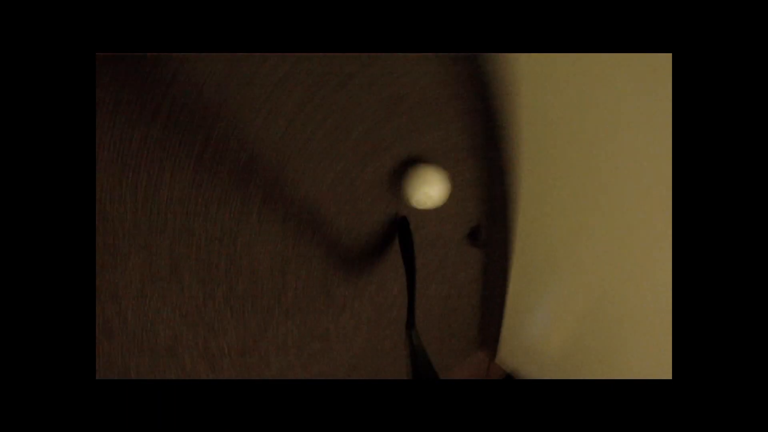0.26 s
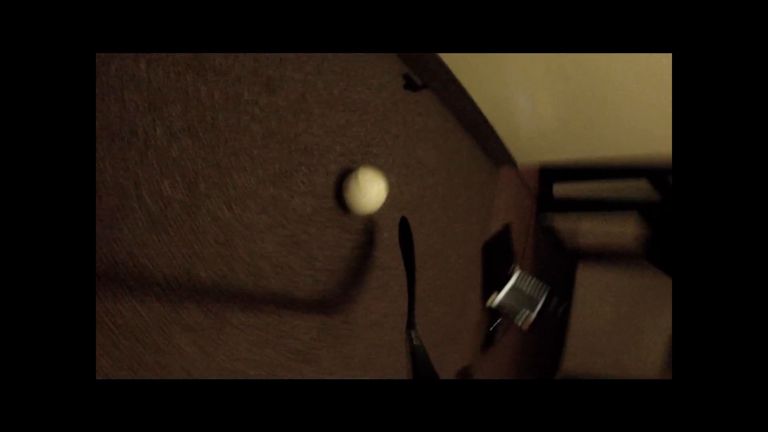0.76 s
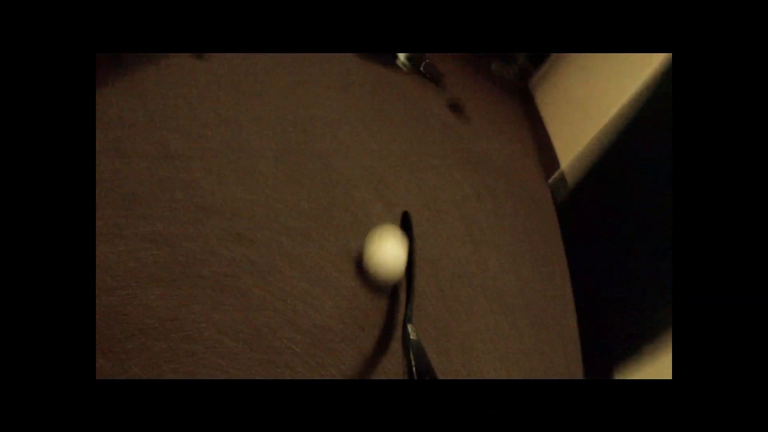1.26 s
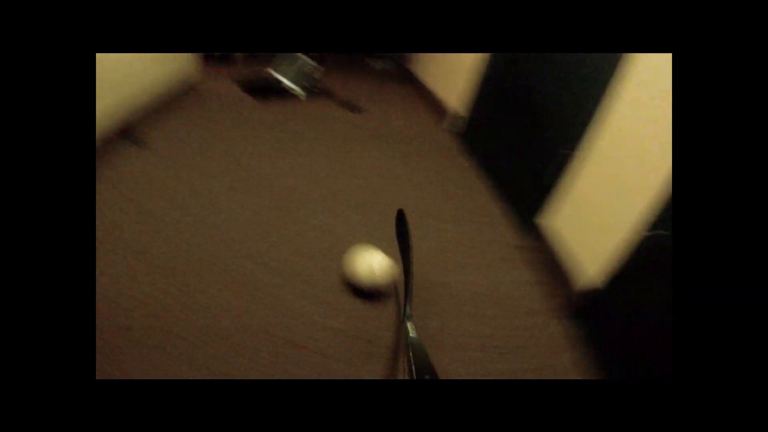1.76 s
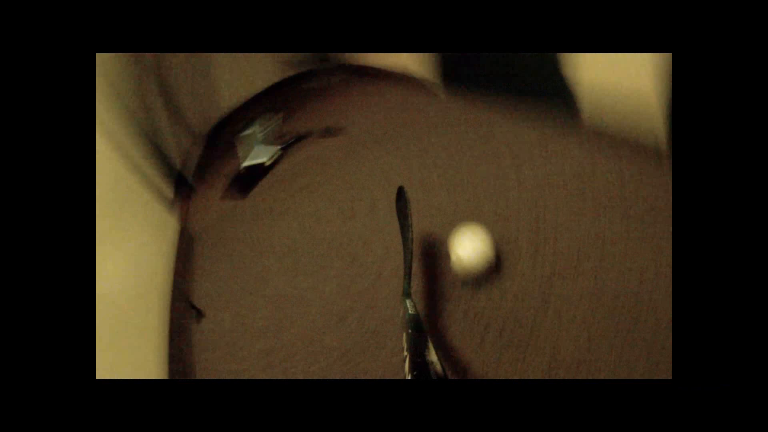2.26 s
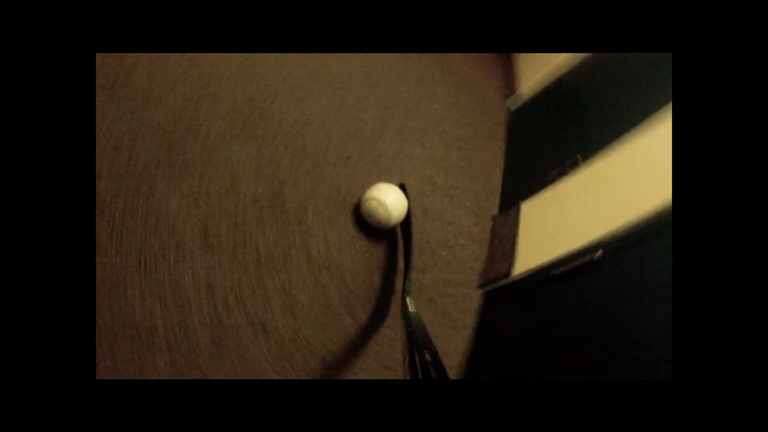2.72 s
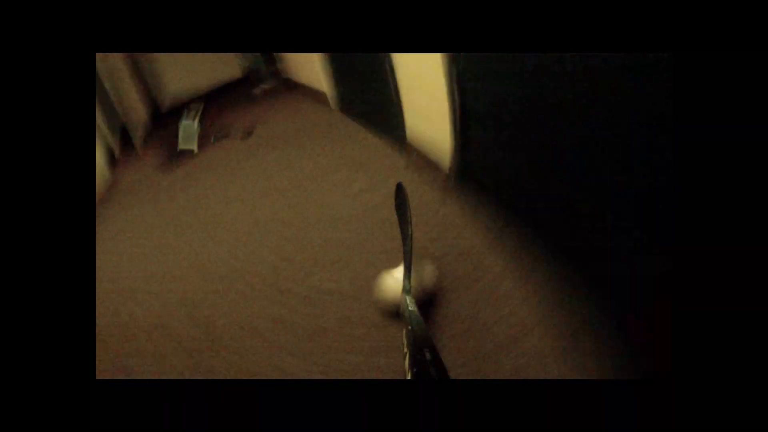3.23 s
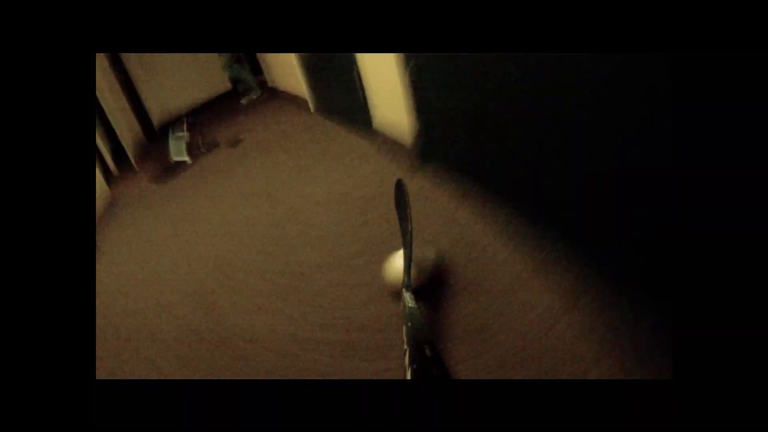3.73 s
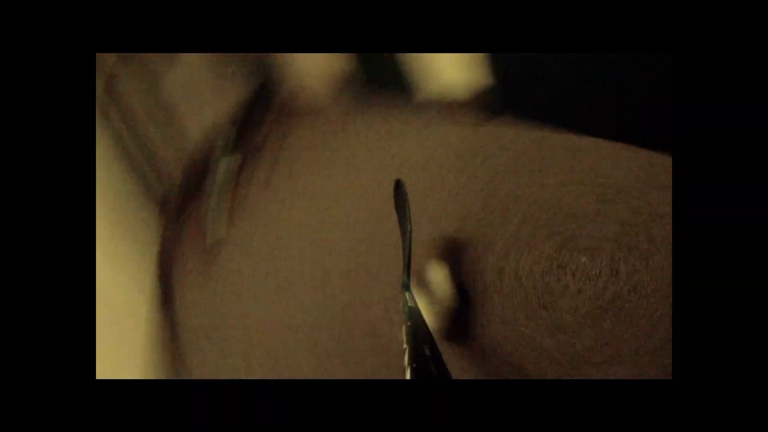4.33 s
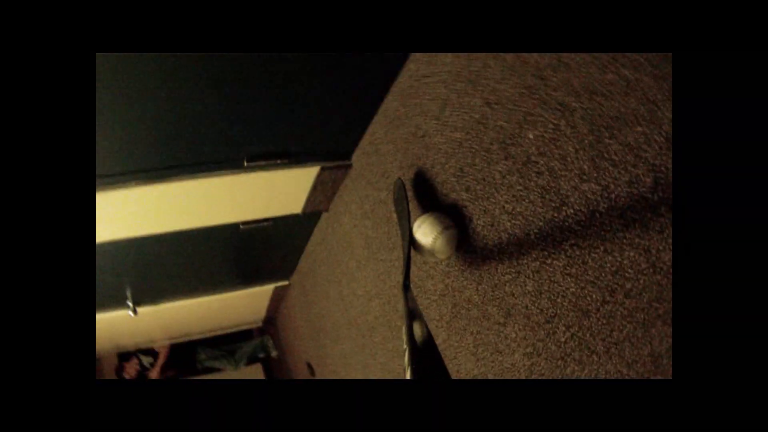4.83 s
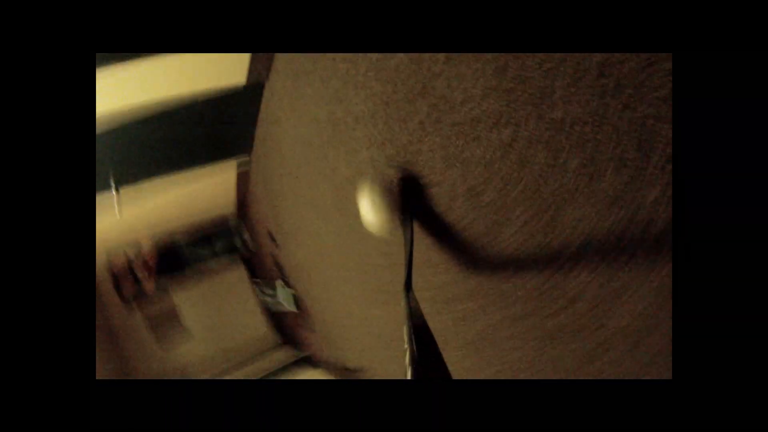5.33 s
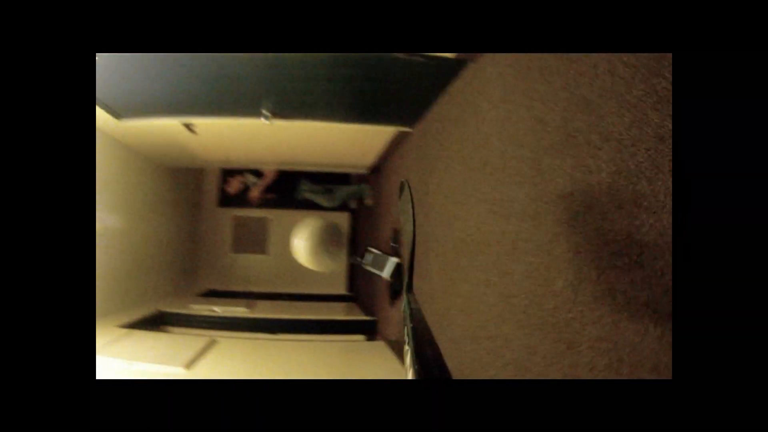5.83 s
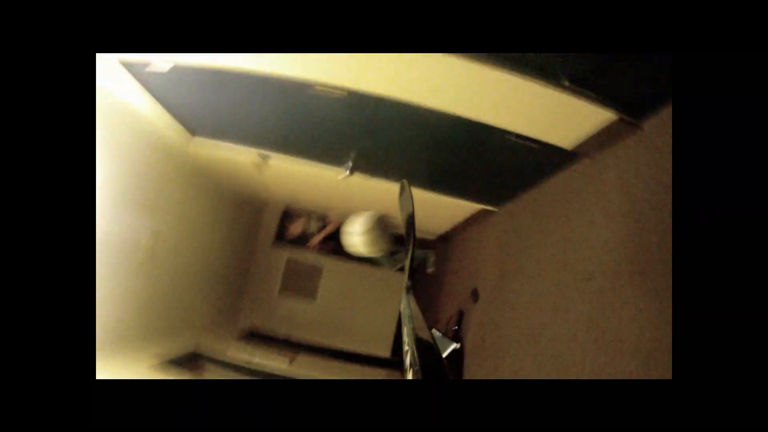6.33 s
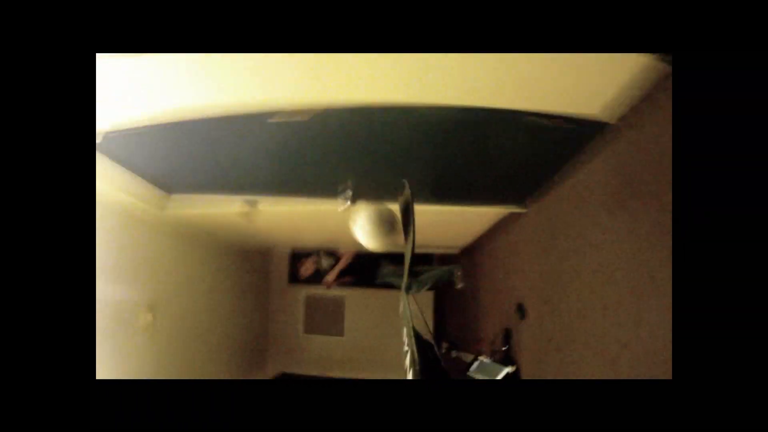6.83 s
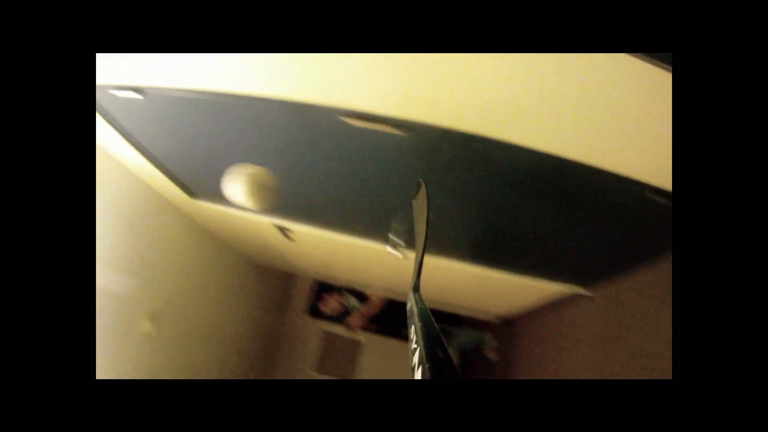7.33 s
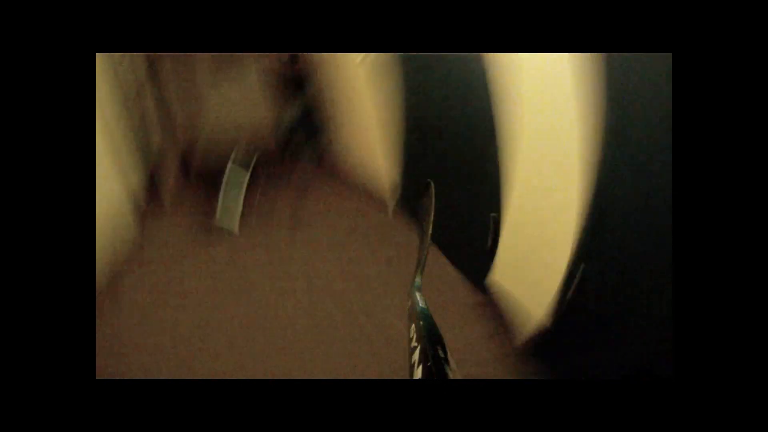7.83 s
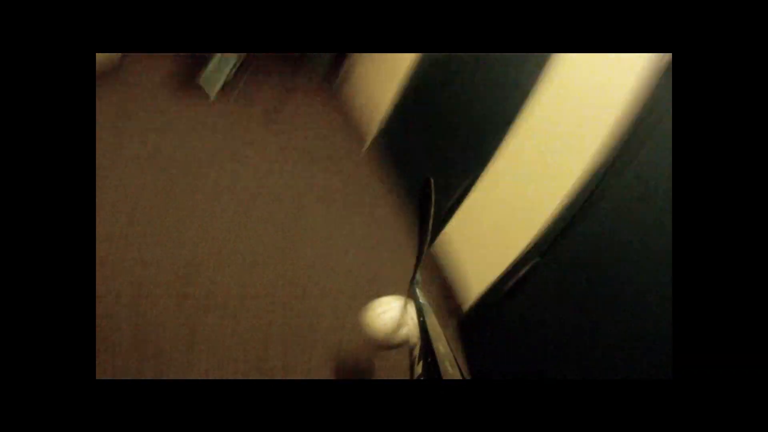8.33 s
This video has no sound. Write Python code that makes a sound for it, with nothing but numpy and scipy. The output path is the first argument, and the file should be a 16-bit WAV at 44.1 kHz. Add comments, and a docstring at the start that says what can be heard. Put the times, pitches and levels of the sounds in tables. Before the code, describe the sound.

Heard through a hockey stick's shaft by a small clamped camera in a carpeted hallway: hard woody clacks of a ball on the blade, two or three a second, distorting at the input. Clamp knocks and short rattles fall between them, with gritty carpet scrapes and low handling rumble. Midway the blade lifts and juggles the ball over a thin bright buzz, then returns to the floor.

```python
"""Carpeted hallway, heard through the shaft of a hockey stick by a small camera clamped to it.
The blade taps a ball, the clamp rattles and knocks: noise bursts ring banks of decaying modes.
The blade scrapes the carpet, or the clamp buzzes while it is lifted (grainy noise through resonances);
the shaft sways and rumbles in the hands (low filtered noise), with dull decaying bumps and hums. Hard taps
overload the input; the camera samples slowly and holds each value, which mirrors the sound into the treble."""
import sys
import numpy as np
from scipy import signal
from scipy.io import wavfile
from scipy.ndimage import uniform_filter1d

SR = 44100
rng = np.random.default_rng(int(sys.argv[2]) if len(sys.argv) > 2 else 0)


def store_pcm(level_fs):
    """Save levels as 16-bit WAV."""
    pcm = np.round(np.clip(level_fs, -1, 1) * 32767).astype(np.int16)
    wavfile.write(sys.argv[1], SR, np.atleast_2d(pcm).T)


N = 377937

# scrapes of the blade on the carpet, and clamp buzz while it is lifted:
# (start [s], length [s], starting level [dB], change over the stroke [dB])
RUB_STROKES = [(0.0, 0.076, -31, -15.5), (0.125, 0.15, -46, 6.5), (0.481, .16, -46.5, 5.5),
               (0.659, .15, -50.5, -2), (0.819, 0.012, -34, -26), (0.879, 0.083, -53.5, 8),
               (1.045, 0.042, -62, 16.5), (1.148, 0.08, -48.5, 14.5), (1.31, 0.26, -70.5, 32),
               (1.651, 0.076, -69, 0.5), (1.797, 0.094, -71, -0.5), (2.071, 0.27, -42, 1),
               (2.521, 0.14, -48.5, -7), (2.834, 0.05, -49, 10), (2.945, 0.22, -55.5, -2.5),
               (3.2, .1, -78, 6), (3.307, 0.044, -49.5, 6), (3.526, 0.12, -50.5, 8.5),
               (3.786, 0.08, -67, 20), (3.958, 0.077, -47.5, 0), (4.091, 0.07, -60.5, 12),
               (4.13, 0.13, -52, 4.5), (4.326, 0.15, -55, 18.5), (4.519, .03, -51.5, 3),
               (4.552, 0.14, -40.5, -2), (4.938, 0.1, -53.5, 10), (5.065, 0.21, -54.5, -8),
               (5.266, 0.043, -49, 2), (5.516, 0.13, -41.5, -26.5), (5.86, .08, -52.5, 5),
               (6.116, 0.15, -58, -8), (6.419, 0.07, -51, 2.5), (6.689, 0.15, -57, -3),
               (6.96, 0.14, -61, 3.5), (7.194, 0.31, -52, -11), (7.628, 0.29, -49.5, -2.5),
               (7.841, 0.22, -52.5, -21), (8.052, 0.27, -49.5, -13), (8.39, 0.048, -68.5, 10.5)]
# blade off the carpet, juggling the ball, only a thin bright buzz left: (from [s], to [s])
LIFTED_SPAN = (5.44, 7.55)
# colour of shaft and case under scrapes and buzz: (pitch [Hz], width of each filter pass [Hz], relative level [dB])
RUB_DULL_BANDS = [(478, 53, -12), (760, 130, -4), (1080, 430, -6.5), (1480, 290, -16.5), (1720, 480, -9)]
RUB_BRIGHT_BANDS = [(2150, 110, 2), (2450, 87, -2), (3300, 1600, -16), (3570, 310, -10.5), (4656, 360, -29),
                    (5160, 800, -16)]
# swings and jolts of the shaft: (peak time [s], level [dB], build-up [s per 20 dB], die-away [s per 20 dB])
SHAFT_SWINGS = [(0.118, -21, 0.3, 0.13), (.28, -23, .14, .1), (.45, -28.5, 0.082, 0.28),
                (0.962, -36, .6, 0.063), (1.118, -37, 0.1, .3), (1.241, -42.5, 0.31, 0.4),
                (1.55, -30.5, 0.15, 0.08), (1.74, -20.5, 0.057, 0.096), (1.91, -34.5, .14, 0.42),
                (2.151, -19.5, 0.027, 0.31), (2.391, -33, .3, .07), (2.55, -24, .045, .2),
                (3.128, -33, 0.47, .13), (3.341, -36, 0.2, .25), (3.601, -31, .14, 0.12),
                (3.87, -29, 0.22, .045), (4.03, -19.5, 0.097, .09), (4.25, -35, .2, .15),
                (4.488, -23, .13, .065), (4.892, -32, 1, .2), (5.039, -19.5, 0.041, 0.37),
                (5.341, -30, 0.59, .08), (5.52, -35, 0.028, .15), (5.62, -31.5, .05, 0.19),
                (5.721, -30, .2, .065), (5.94, -41, 0.098, .3), (6.28, -36.5, .3, 0.071),
                (6.52, -38.5, .19, .13), (6.78, -35.5, .23, 0.21), (7.042, -32, 0.078, .15),
                (7.47, -28, 0.24, 0.14), (7.658, -27.5, 0.054, 0.43), (7.779, -23, 0.17, 0.32),
                (8.09, -30.5, .15, .1), (8.328, -29, 0.19, .095), (8.475, -35, .02, 0.2)]
# sway and grip resonances: (pitch [Hz], width of each filter pass [Hz], relative level [dB])
SWAY_BANDS = [(54.56, 18, -3), (38.3, 6.7, -9.5), (28.7, 8.5, -7)]
GRIP_BANDS = [(120.5, 5.7, 5), (195, 32, 1.5), (292, 15, -7)]
# grip rumble before it follows sway and rubbing: (time [s], level [dB])
GRIP_CURVE = [(0.0, -30), (0.07, -54.5), (0.76, -56.5), (1.14, -57.5), (1.31, -62.5), (2.22, -52),
              (2.67, -55.5), (3.84, -59), (4.18, -48), (5.04, -59), (5.2, -54), (5.37, -57), (6.25, -81),
              (6.4, -65), (7.47, -61.5), (7.69, -53.5), (8.28, -64), (8.57, -55.5)]
# clamp knocks, rebounds and scuffs: (time [s], level [dB], upper modes [dB], rattle t60 [s])
KNOCKS = [(0.003, -14.5, -2, 0.046), (0.081, -16.5, -3, 0.057), (0.104, -8.5, 8, 0.058),
          (0.475, -23.5, 14, 0.034), (0.487, -33, 5, 0.038), (.69, -24, 32, 0.036), (0.699, -25, 38, 0.03),
          (.743, -35, 25, 0.13), (0.816, -26.5, -5, 0.081), (0.912, -30.5, 12, 0.042),
          (1.049, -34, -25, 0.096), (1.159, -28.5, -13, 0.3), (1.485, -29, 29.5, 0.088),
          (1.512, -24.5, 4, 0.024), (1.727, -13.5, -3.5, 0.028), (1.74, -12.5, -4, 0.056),
          (1.802, -42.5, -2, .03), (1.859, -42, -25, .06), (1.936, -11, 2, 0.066),
          (2.166, -20, -6.5, 0.095), (2.458, -35.5, -1.5, 0.037), (2.528, -31.5, -12, 0.092),
          (2.706, -16.5, 2, 0.046), (2.825, -39.5, -24.5, 0.045), (2.875, -33.5, -24.5, 0.067),
          (2.95, -31, -9, 0.049), (3.253, -37, 12, 0.044), (3.309, -29, 24.5, 0.039),
          (3.377, -16.5, 8.5, 0.027), (3.457, -38, -24, 0.044), (3.524, -23, 8, 0.033),
          (3.591, -21.5, 8, 0.029), (3.989, -10.5, 2.5, 0.034), (4.12, -9.5, 19, 0.056),
          (4.269, -18.5, -3.5, 0.023), (4.298, -25, -4, 0.078), (4.397, -34, -5, 0.051),
          (4.426, -29, -4, 0.082), (4.556, -22.5, -12, 0.065), (4.806, -28, -5, 0.065),
          (5.036, -18, 18, 0.077), (5.061, -19, -23, 0.041), (5.084, -23, -27, 0.14),
          (5.099, -11.5, 4, 0.021), (5.123, -9.5, -15.5, 0.036), (5.159, -26.5, 1, 0.042),
          (5.193, -32, -6, 0.03), (5.345, -20, -5, 0.096), (5.51, -35, 32.5, 0.031),
          (5.577, -27.5, 28, 0.22), (5.746, -28, 3.5, 0.015), (5.895, -36, 24, 0.033),
          (6.126, -34, 34.5, 0.033), (6.16, -30, 34, 0.055), (6.418, -33.5, 30.5, 0.044),
          (6.531, -13.5, 8.5, 0.069), (6.687, -33, 31, 0.15), (6.825, -5, 5, 0.04),
          (6.955, -36.5, 34, 0.13), (6.992, -40.5, 9, .05), (7.103, -22.5, -8.5, 0.062),
          (7.177, -28.5, 26, 0.013), (7.507, -16, -1.5, 0.049), (7.655, -28, -2, 0.14),
          (7.754, -26.5, 3, 0.06), (7.807, -21.5, -8, 0.048), (7.828, -20, 0, 0.024),
          (7.953, -34, -6, 0.017), (8.066, -21, 2, 0.048), (8.18, -36, -10, 0.05),
          (8.286, -13.5, -10.5, 0.077)]
# shaft modes: (pitch [Hz], level [dB], t60 [s])
SHAFT_MODES = [(156, -3.5, 0.042), (192, -1, 0.047), (251, -1.5, 0.044), (319.7, -10, 0.069),
               (440, -12.5, 0.015)]
# blade modes: (multiple of blade pitch [ratio], level [dB], t60 [s], raised to 4 ms if shorter)
BLADE_RATIOS = [(1, 7.5, 0.011), (1.3, 2, 0.011), (.72, -23.5, 0.0025)]
# clamp and case modes: (pitch [Hz], level [dB], t60 [s])
CASE_MODES = [(1660, -10, 0.024), (2011, 11.5, 0.0084), (2252, 0, 0.011), (2768, -24, 0.01),
              (3484, -1, 0.011), (4320, -30, 0.0082), (4780, -51, 0.049)]
# dull bumps of the shaft against hands and carpet: (time [s], level [dB], pitch [Hz], t60 [s])
SHAFT_BUMPS = [(0.016, -24, 242, 0.16), (0.085, -13, 89, 0.077), (.286, -8, 70.3, 0.039),
               (0.418, -6, 193, 0.035), (1.234, -15.5, 414, 0.026), (1.66, -31.5, 150, 0.041),
               (1.725, -1, 197, 0.035), (1.74, -8.5, 128.4, 0.083), (1.901, -5, 170, 0.042),
               (2.133, -20.5, 93, 0.029), (2.164, -29.5, 93, 0.073), (3.989, -9, 185.6, 0.061),
               (4.433, -29.5, 91.5, 0.069), (4.469, -10, 70, 0.088), (4.674, -22, 194, 0.077),
               (5.021, -18.5, 90.5, 0.06), (5.056, -16.5, 200, 0.091), (5.084, -14, 160, 0.079),
               (5.274, -13.5, 155.7, 0.099), (7.644, -26.5, 95.2, 0.048), (7.768, -9.5, 79.4, 0.043),
               (8.284, -25, 186, 0.19)]
# ball on blade: (time [s], level [dB], blade pitch [Hz], upper modes [dB], shaft modes [dB], contact [ms])
BALL_TAPS = [(0.289, 1, 780, 5.5, -32, 5.05), (0.419, -2.5, 786, -5.5, -12.5, 3.96),
             (0.953, 31, 845, -13, -33.5, 5.46), (1.107, 11, 970, 2.5, -10, 3.2),
             (1.237, 8.5, 760, -6, -32.5, 3.5), (1.539, 16.5, 1058, -4.5, -9.5, 5.5),
             (1.902, 12.5, 843, 11, -14.5, 3.47), (2.358, 14.5, 1100, 2.5, -18, 3.27),
             (2.689, 19, 870, -4.5, -33.5, 4.24), (3.123, 18.5, 660, 4, -55, 5),
             (3.352, 21.5, 925, -2.5, -17.5, 4.83), (3.618, 18.5, 822, -2, -7.5, 5.5),
             (3.827, -2, 856, -5.5, -9.5, 6.3), (4.237, 9.5, 1112, -12, -10.5, 6.9),
             (4.782, 3, 955, -3.5, -8.5, 6), (5.276, -3.5, 980, 4, -8.5, 4.4),
             (5.306, 0.5, 1126, -24, -48, 7.2), (5.713, 10.5, 1020, -0.5, -28.5, 7.3),
             (5.967, 18, 892, -1, -67, 5.8), (6.274, 33.5, 833, 6.5, -58, 4.2),
             (6.505, 16.5, 1147, -13.5, -17, 6.6), (6.791, 23, 1108, -5.5, -30, 5.3),
             (7.063, 13, 1284, 2.5, -14, 8), (7.475, 16.5, 813, 0, -35, 5.84),
             (8.247, 15.5, 770, -2, -19.5, 5.8), (8.467, 5.5, 756, -3.5, -4, 5.7)]
# the shaft humming on after some taps and knocks: (time [s], level [dB])
SHAFT_HUMS = [(.953, -37.5), (1.74, -31), (2.689, -34.5), (3.123, -29), (3.617, -31), (3.827, -34.5),
              (3.989, -35), (4.237, -34.5), (4.782, -30), (5.345, -40), (7.063, -34.5), (7.506, -31),
              (8.286, -31.5), (8.467, -32.5)]

HISS_DB = -79
STROKE_RISE, STROKE_FALL = .015, .025  # s per 20 dB
RUB_REST_DB, LIFTED_REST_DB = -66, -76  # between strokes, blade on and off the carpet
BRIGHT_DB, LIFTED_BRIGHT_DB = -4.5, 5  # bright share against the dull, blade on and off the carpet
SURGE_DB = 2.5  # slow uneven surges of the grain
CRACKLES_PER_S, CRACKLE_DB, CRACKLE_DECAY_S = 26, 12, 0.00067
GRIP_FOLLOWS_SWAY, GRIP_FOLLOWS_RUB = 0.4, .25  # dB of grip per dB of sway or rubbing
GRIP_LUMP_DB = 2.5
KNOCK_HZ, KNOCK_SPREAD = 1004, 0.07  # blade pitch under a knock and its scatter
KNOCK_SHAFT_DB, KNOCK_SHAFT_TILT = -18.5, 1  # the brighter a knock, the less it moves the shaft
# rattle after a 0 dB tap, against the contact; dB the rattle gains per dB of blow; t60
RATTLE_DB, RATTLE_GROWTH, RATTLE_T60_S = -14, 0.24, 0.057
BLOOM_DB = -12.5  # how much the rattle also rings the shaft
HUM_HZ, HUM_T60_S = 337, .12
CEILING, HOLD_HZ, TOP_HZ = .5, 12000, 16300  # full level, held values per second, top cut


def undb(db):
    """Gain for a level in dB."""
    return 10 ** (np.asarray(db) / 20)


def unit(x):
    """Scale to an RMS of 1."""
    return x / np.sqrt(np.mean(x ** 2))


def walk(rate):
    """Random levels drawn rate times a second, each sliding into the next."""
    k = int(SR / rate)
    steps = np.repeat(rng.standard_normal(N // k + 1), k)
    return uniform_filter1d(steps, k)[:N]


def steep(x, band):
    """One resonance passed twice, for steep skirts."""
    hz, width, db = band
    b, a = signal.iirpeak(hz, hz / width, SR)
    return undb(db) * signal.lfilter(b, a, signal.lfilter(b, a, x))


def swells(rows):
    """Summed level in dB of (start s, length s, dB, change dB, rise s, fall s) shapes; rise and fall per 20 dB."""
    t = np.arange(0, N / SR, .001)
    power = 1e-12
    for s, hold, db, change, rise, fall in rows:
        slope_db = change * np.clip((t - s) / max(hold, .001), 0, 1)
        before_db = 20 * np.maximum(s - t, 0) / max(rise, .004)
        after_db = 20 * np.maximum(t - s - hold, 0) / max(fall, .004)
        power = power + undb(2 * (db + slope_db - before_db - after_db))
    return np.interp(np.arange(N) / SR, t, 10 * np.log10(power))


def hiss():
    """Steady white noise floor."""
    return undb(HISS_DB) * rng.standard_normal(N)


def lifted():
    """True while the blade is off the carpet."""
    t = np.arange(N) / SR
    return np.abs(t - np.mean(LIFTED_SPAN)) < np.ptp(LIFTED_SPAN) / 2


def rub_level():
    """Level in dB of carpet scrapes, and of clamp buzz while the blade is lifted, over a quiet rest level."""
    strokes_db = swells([(*row, STROKE_RISE, STROKE_FALL) for row in RUB_STROKES])
    rest_db = np.where(lifted(), LIFTED_REST_DB, RUB_REST_DB)
    return 20 * np.log10(undb(strokes_db) + undb(rest_db))


def rub_colour(catch, bands):
    """Resonances of shaft and case, each fed its own noise and swelling on its own."""
    return unit(sum(undb(2.5 * walk(25)) * steep(catch * rng.standard_normal(N), band) for band in bands))


def rubbing(rub_db):
    """Dense uneven grains and crackles: fibres catch and snap on the carpet, the clamp buzzes while lifted."""
    catch = undb(3.5 * walk(200) + 2.5 * walk(50) + SURGE_DB * walk(14))
    snaps = (rng.random(N) < CRACKLES_PER_S / SR) * rng.exponential(size=N)
    crackle = signal.lfilter([1], [1, -np.exp(-1 / (CRACKLE_DECAY_S * SR))], snaps)
    catch = catch * (1 + undb(CRACKLE_DB) * crackle)
    dull = rub_colour(catch, RUB_DULL_BANDS)
    bright = rub_colour(catch, RUB_BRIGHT_BANDS)
    bright_db = np.where(lifted(), LIFTED_BRIGHT_DB, BRIGHT_DB)
    # the overall level stays put as the bright share changes
    return undb(rub_db) * (dull + undb(bright_db) * bright) / np.sqrt(1 + undb(2 * bright_db))


def hands(rub_db):
    """The shaft sways at its lowest resonances; the grip rumbles in lumps above them."""
    sway_db = swells([(s, 0, db, 0, rise, fall) for s, db, rise, fall in SHAFT_SWINGS])
    sway = sum(steep(rng.standard_normal(N), band) for band in SWAY_BANDS)
    # level out the chance swells of the noise so the sway follows its swings
    chance_swell = np.sqrt(uniform_filter1d(sway ** 2, int(0.036 * SR)))
    even_sway = unit(sway / chance_swell ** 0.86)

    grip = unit(sum(steep(rng.standard_normal(N), band) for band in GRIP_BANDS))
    grip_s, grip_level = np.transpose(GRIP_CURVE)
    grip_db = np.interp(np.arange(N) / SR, grip_s, grip_level)
    grip_db = grip_db + GRIP_FOLLOWS_SWAY * (sway_db - sway_db.mean())
    grip_db = grip_db + GRIP_FOLLOWS_RUB * (rub_db - rub_db.mean())
    return undb(sway_db) * even_sway + undb(grip_db + GRIP_LUMP_DB * walk(13)) * grip


def ring(modes, scale=1):
    """Decaying modes, a little different in level and pitch for each blow; peak 1."""
    t = np.arange(SR // 10) / SR
    y = np.zeros(len(t))
    for hz, db, t60 in modes:
        level = undb(db + 1.5 * rng.standard_normal())
        pitch = hz * scale * (1 + .015 * rng.standard_normal())
        y += level * np.sin(2 * np.pi * pitch * t) * 1000. ** (-t / max(t60, .004))
    return y / np.abs(y).max()


def blow(hz, upper_db, shaft_db, contact_ms, rattle_db, rattle_t60):
    """Uneven chatter while the contact lasts and a ragged rattle after it ring blade, clamp and shaft."""
    t = np.arange(SR // 4) / SR
    chatter = rng.standard_normal(len(t))
    smoothed = uniform_filter1d(rng.standard_normal(len(t)), int(SR * 0.0024))
    ragged = undb(4.5 * np.sqrt(SR * 0.0018) * smoothed)
    rattle = undb(rattle_db) * ragged * 1000. ** (-t / max(rattle_t60, .005))
    contact = np.exp(-(t / (max(contact_ms, .3) / 1000)) ** 4)
    force = chatter * (contact + rattle) * (1 - np.exp(-t / 0.00055))  # soft onset
    body = ring(BLADE_RATIOS, hz) + undb(upper_db) * ring(CASE_MODES)
    shaft = ring(SHAFT_MODES)
    y = signal.fftconvolve(force, body)
    y = y + undb(BLOOM_DB) * signal.fftconvolve(chatter * rattle, shaft)
    y = y / np.abs(y).max()
    # the shaft takes the first push, downwards
    y[:len(shaft)] -= undb(shaft_db) * shaft
    return y


def knocks():
    """Clamp knocks, rebounds and scuffs: a very short contact with a strong rattle behind it."""
    out = np.zeros(N + SR)
    for s, db, bright_db, t60 in KNOCKS:
        hz = KNOCK_HZ * (1 + KNOCK_SPREAD * rng.uniform(-0.83, 1))
        shaft_db = KNOCK_SHAFT_DB - KNOCK_SHAFT_TILT * bright_db
        y = blow(hz, bright_db, shaft_db, contact_ms=1.5, rattle_db=-3.0, rattle_t60=t60)
        i = int(s * SR)
        out[i:i + len(y)] += undb(db) * y
    return out[:N]


def soft_pushes(rows):
    """Each soft downward push sets off one tone that the shaft damps away."""
    out, t = np.zeros(N + SR), np.arange(SR // 5) / SR
    for s, db, hz, t60 in rows:
        envelope = (1 - np.exp(-t / 0.0013)) * 1000. ** (-t / max(t60, .01))
        i = int(s * SR)
        out[i:i + len(t)] -= undb(db) * np.sin(2 * np.pi * hz * t) * envelope
    return out[:N]


def bumps():
    """Dull thuds as the shaft meets hands and carpet, each at its own low pitch."""
    return soft_pushes(SHAFT_BUMPS)


def taps():
    """Ball on blade: a contact of a few milliseconds; harder blows rattle less in proportion."""
    out = np.zeros(N + SR)
    for s, db, hz, upper_db, shaft_db, contact_ms in BALL_TAPS:
        rattle_db = RATTLE_DB - (1 - RATTLE_GROWTH) * db
        y = blow(hz, upper_db, shaft_db, contact_ms, rattle_db, RATTLE_T60_S)
        i = int(s * SR)
        out[i:i + len(y)] += undb(db) * y
    return out[:N]


def hums():
    """The shaft hums on at one pitch after some taps and knocks."""
    return soft_pushes([(s, db, HUM_HZ, HUM_T60_S) for s, db in SHAFT_HUMS])


def scene():
    """Sum all layers as they reach the camera through the shaft."""
    rub_db = rub_level()
    handling = rubbing(rub_db) + hands(rub_db)
    impacts = knocks() + bumps() + taps() + hums()
    return (hiss() + handling + impacts)[None]


def record(dry):
    """Gain control that answers overload late, hard ceiling, slow sampling with held values, steep top cut."""
    keep = np.exp(-1 / (0.075 * SR))  # 75 ms smoothing
    excess = np.maximum(np.abs(dry) - CEILING, 0)
    overload = signal.lfilter([1 - keep], [1, -keep], excess)
    clipped = np.clip(dry / (1 + 0.7 * overload), -CEILING, CEILING)[0]
    clipped = signal.lfilter(*signal.butter(1, 6000, fs=SR), clipped)
    samples = np.interp(np.arange(0, N / SR, 1 / HOLD_HZ), np.arange(N) / SR, clipped)
    # each value is held for four steps, which mirrors the sound around multiples of the hold rate
    held = signal.resample_poly(np.repeat(samples, 4), SR, 4 * HOLD_HZ)[None, :N]
    soft = signal.sosfilt(signal.butter(4, 15200, fs=SR, output="sos"), held)
    return signal.sosfilt(signal.ellip(10, .2, 80, TOP_HZ, fs=SR, output="sos"), soft)


dry = scene()
out = record(dry)
store_pcm(out)
```